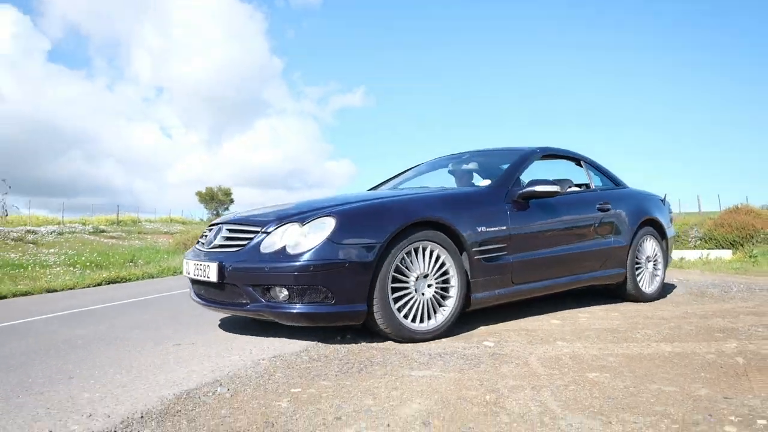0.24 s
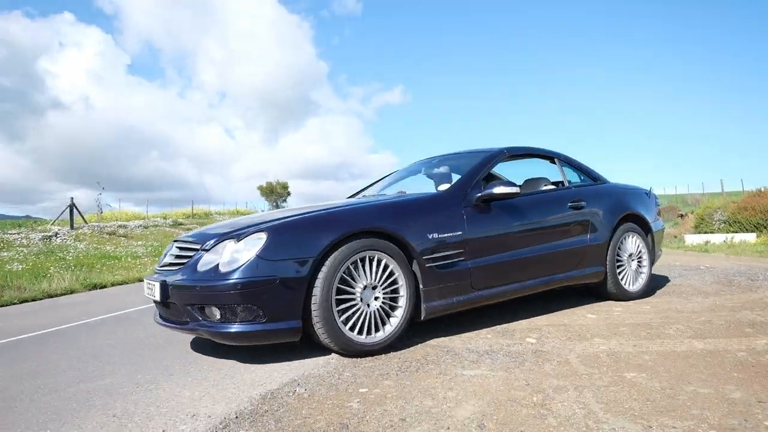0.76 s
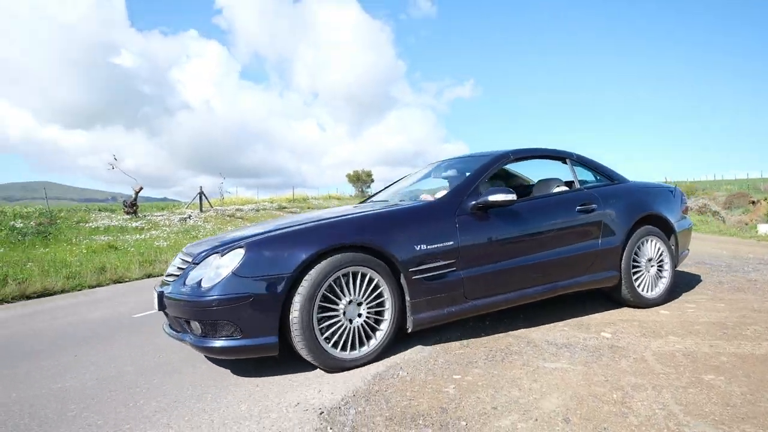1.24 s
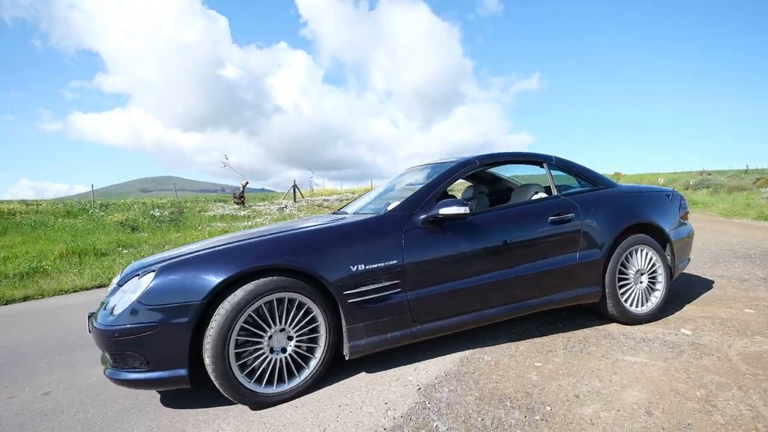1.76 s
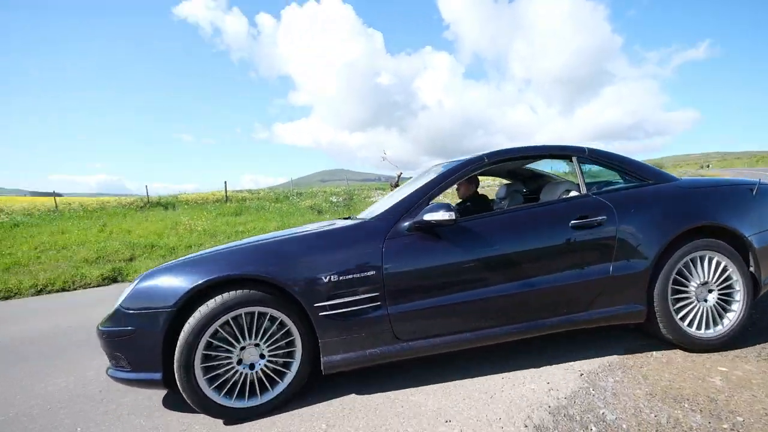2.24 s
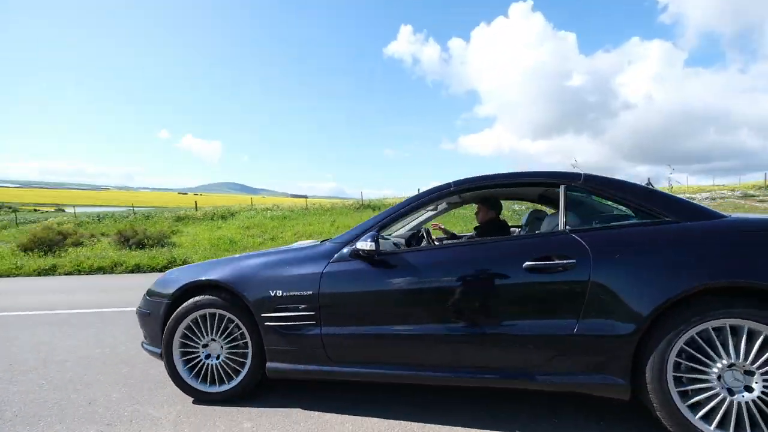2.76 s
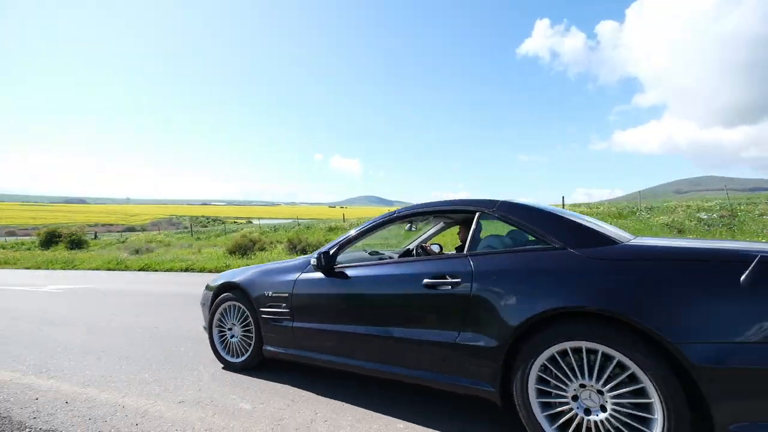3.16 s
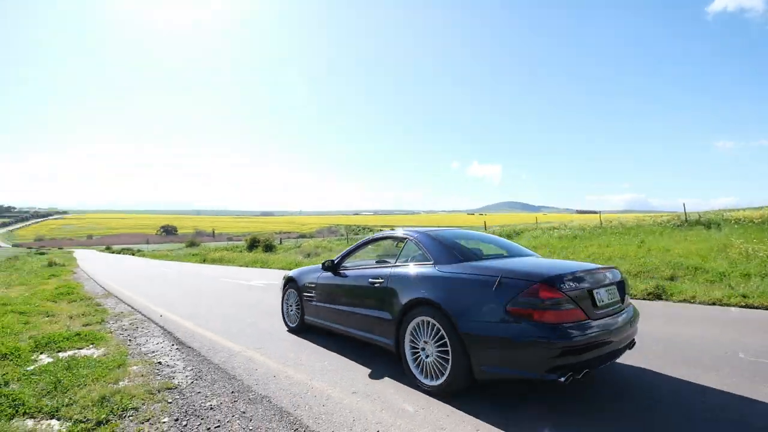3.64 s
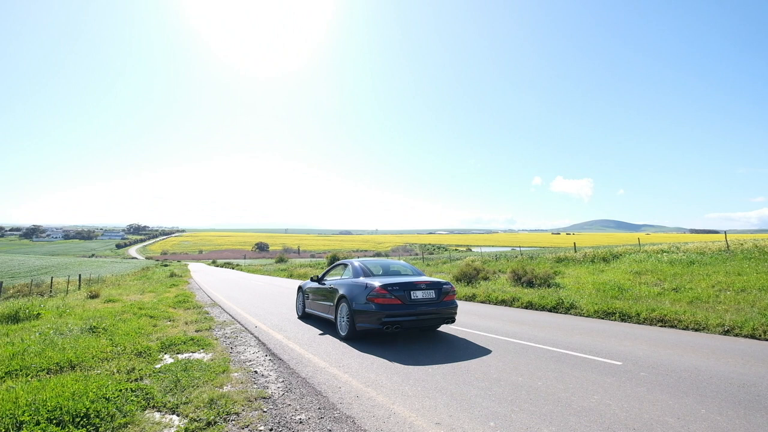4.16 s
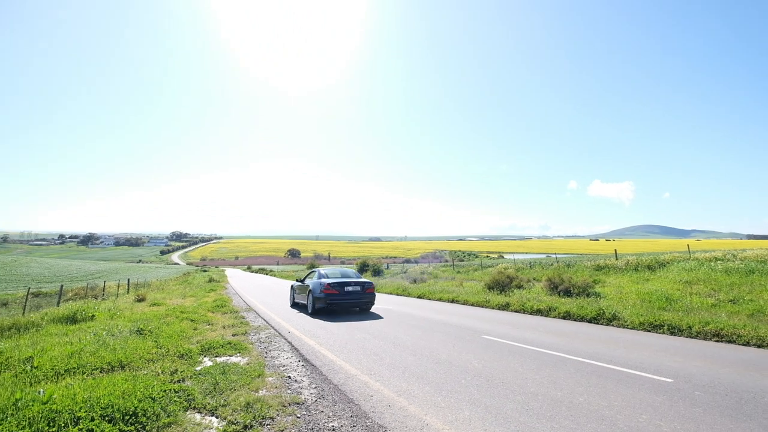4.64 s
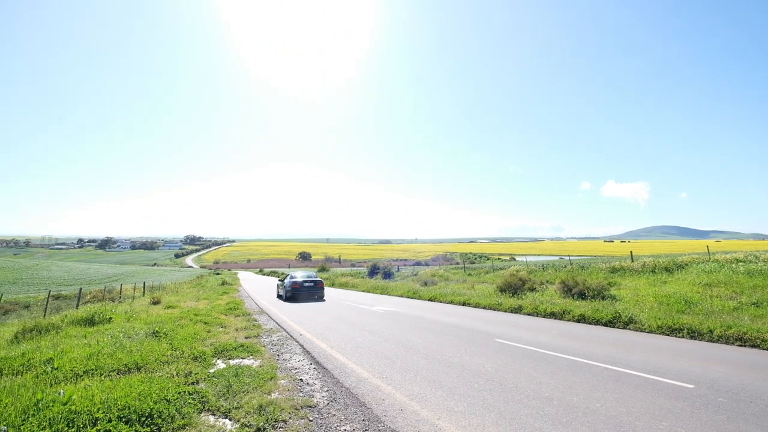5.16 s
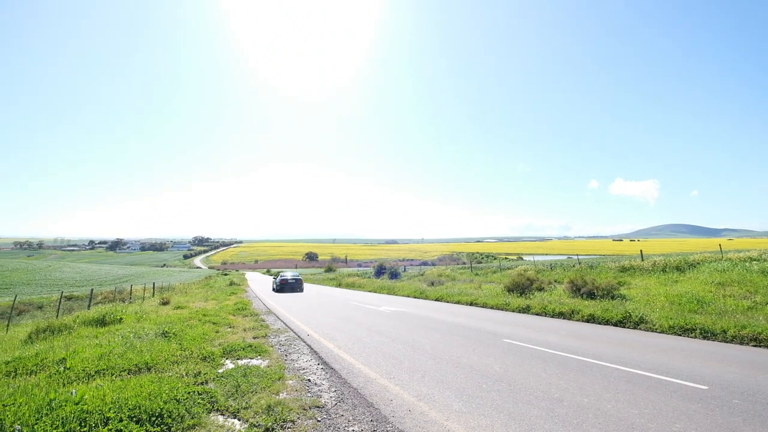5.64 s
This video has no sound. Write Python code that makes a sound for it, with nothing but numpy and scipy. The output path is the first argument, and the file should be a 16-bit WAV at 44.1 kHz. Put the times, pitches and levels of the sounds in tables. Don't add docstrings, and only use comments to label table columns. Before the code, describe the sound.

Outdoors, close stereo microphones. A large eight-cylinder car idles quietly while gravel snaps sharply under its slowly rolling tyres. Bay noise and soft hiss surround the low uneven burble. It sweeps past with a brief bass boom and tyre hiss, then the tail pipes turn to the listener: a quick raspy throttle stab, a short dip, and a hard pull away, rising in pitch as it grows duller with distance.

```python
import sys
import numpy as np
from scipy import signal
from scipy.fft import rfft, irfft, next_fast_len
from scipy.io import wavfile
from scipy.ndimage import uniform_filter1d

SR = 44100
rng = np.random.default_rng(int(sys.argv[2]) if len(sys.argv) > 2 else 0)


def materialize(psi):
    bounded = np.clip(np.atleast_2d(psi).T, -1, 1)
    quanta = np.round(bounded * 32767).astype(np.int16)
    wavfile.write(sys.argv[1], SR, quanta)


def boost(x):
    u = np.asarray(x, float) / 20
    return 10 ** u


N = 260008
TIME_S = np.arange(N) / SR
SHORT_CUT_S = 0.022

# thump size, crack level in dB, lag in ms (the far bank is later).
CYLINDERS = [(0.65, 1.5, 0.021), (0.17, -1.5, 0.7), (0.57, -10.5, 0), (0.57, -5.5, 0.58),
             (0.14, -9.5, 0.68), (0.75, -6.5, 0.16), (0.28, -4.5, 0.66), (1.31, -2, 0.067)]
# time in s, engine cycles per s.
SPEED = [(0.0, 5.64), (0.842, 5.43), (1.478, 5.62), (2.304, 6.05), (2.582, 8.2), (2.842, 7.91),
         (3.179, 8.98), (3.408, 14.02), (3.559, 14.46), (3.633, 16.95), (3.769, 19.11), (3.861, 17.71),
         (3.972, 17.33), (4.509, 27.65), (4.69, 29.91), (5.111, 34.66), (5.519, 26.06), (5.9, 28.61)]
# time in s, even firing tone in dB, effort (how hard pulses leave the pipes) in dB.
DRIVE = [(0, -32.5, -52.5), (.9, -34, -48.5), (2.2, -29.5, -47.5), (2.6, -26.5, -55), (3.1, -25, -52),
         (3.24, -24.5, -43), (3.35, -27, -35.5), (3.52, -24.5, -38.5), (3.68, -23, -34), (3.8, -18, -29.5),
         (3.98, -25.5, -41.5), (4.3, -23.5, -31), (4.55, -28, -32), (4.9, -29.5, -30), (5.14, -29.5, -29),
         (5.4, -27, -33.5), (5.62, -24.5, -33.5), (5.9, -29, -34.5)]
# frequency in Hz, level in dB.
PIPE = [(28, -29), (45, 3), (65, -0.5), (85, -1), (300, 0.5), (380, -7.5), (450, -10.5), (520, -41)]


def unit(x):
    return x / np.sqrt(np.mean(x ** 2) + 1e-20)


def along(points, hz):
    f, v = np.transpose(points)
    return np.interp(np.log(hz + 1), np.log(f + 1), v)


def curves(rows):
    s, *cols = np.transpose(rows)
    return [np.interp(TIME_S, s, c) for c in cols]


def wobble(rate_hz):
    knots = rng.standard_normal(int(N * rate_hz / SR) + 2)
    return np.interp(TIME_S * rate_hz, np.arange(len(knots)), knots)


def filtered(x, response):
    m = 2 * next_fast_len(N // 2 + SR // 4)
    return irfft(rfft(x, m) * response(np.fft.rfftfreq(m, 1 / SR)), m)[..., :N]


def resonance(f, centre_hz, width_hz):
    return 1j * f * width_hz / (centre_hz ** 2 - f ** 2 + 1j * f * width_hz)


def power_sum_db(front, rear):
    return 10 * np.log10(front ** 2 + rear ** 2 + 1e-12)


def rush(spectrum, patchy_db):
    # frequency in Hz, left-right likeness 0-1.
    alike = [(60, 0.99), (130, 1.0), (290, 1.0), (640, 1), (1410, 0.97), (3100, 0.54), (6820, 0.018),
             (15000, 0.034)]
    z = signal.stft(rng.standard_normal((2, N + 512)), nperseg=512)[2]
    field = uniform_filter1d(rng.standard_normal(z.shape[1:]), size=6, axis=0)
    field = uniform_filter1d(field, size=10, axis=1)
    pair = signal.istft(z * boost(patchy_db * unit(field)), nperseg=512)[1][:, :N]

    def mid_side(hz):
        turn = np.arccos(np.clip(along(alike, hz), -1, 1)) / 2
        return boost(along(spectrum, hz)) * [np.cos(turn), np.sin(turn)]

    mid, side = filtered(pair, mid_side)
    return unit(np.array([mid + side, mid - side]))


def crank(cycle_hz, lead_s):
    first_firing_s = 5.494
    turns = np.cumsum(cycle_hz) / SR + lead_s * cycle_hz
    return turns - turns[round(first_firing_s * SR)]


def passing():
    pass_s, width_s = 3.493, 0.21
    return np.exp(-((TIME_S - pass_s) / width_s) ** 2)


def bursts():
    # centre in s, width in s, rasp in dB, snap in dB, hiss in dB.
    openings = [
        (3.82, .07, 4.5, -8.5, -11.5),
        (4.35, 0.1, 2, 9, -0.5),
    ]
    total_db = 0
    for s, width_s, *extra_db in openings:
        total_db = total_db + np.exp(-((TIME_S - s) / width_s) ** 2) * np.array(extra_db)[:, None]
    return total_db


def strong_orders(cycle_hz, tone_db, effort_db, hidden_db):
    # order, level over effort in dB.
    uneven = [(3, 3), (5, -1), (11, 2.5), (13, 1.5)]
    # frequency in Hz, level in dB.
    overtone = [(90, -15.5), (118, -12), (137, -44), (185, -21), (230, -12), (300, -5.5), (445, -10.5),
                (490, -24)]
    bank_gap_hz, bank_share = 113.7, 0.5
    boom_db = 21.5
    levels_db = {}
    for k, over_db in uneven:
        hz = k * cycle_hz
        comb = 1 + bank_share ** 2 - 2 * bank_share * np.cos(2 * np.pi * hz / bank_gap_hz)
        levels_db[round(k)] = effort_db + over_db + along(PIPE, hz) + 10 * np.log10(comb) - hidden_db
    levels_db[5] = levels_db[5] + boom_db * passing()
    levels_db[8] = tone_db
    levels_db[16] = tone_db + along(overtone, 16 * cycle_hz)
    return levels_db


def weak_order(k, cycle_hz, effort_db, hidden_db):
    lowest_db, fourth_boom_db = -5, 7
    db = effort_db + along(PIPE, k * cycle_hz) - k % 2 * hidden_db
    return db + lowest_db * (k == 2) + fourth_boom_db * passing() * (k == 4)


def thump(cycle_hz, facing, unsteady_db):
    tone_db, effort_db = curves(DRIVE)
    pattern = np.fft.fft(np.transpose(CYLINDERS)[0])
    hidden_db = 10 * (1 - facing)
    levels_db = strong_orders(cycle_hz, tone_db, effort_db, hidden_db)
    for k in range(2, 19):
        if k not in levels_db:
            levels_db[k] = weak_order(k, cycle_hz, effort_db, hidden_db)
    steady, early = crank(cycle_hz, 0), crank(cycle_hz, SHORT_CUT_S)
    out = np.zeros(N)
    for k, db in levels_db.items():
        phase = np.angle(pattern[k % len(pattern)]) + 1.3 + 0.12 * wobble(9)
        angle = 2 * np.pi * k * (early if k % 8 else steady) + phase
        out += np.sqrt(2) * boost(db + unsteady_db * wobble(9)) * np.cos(angle)
    return out


def engine_bay(facing):
    # frequency in Hz, density in dB per Hz.
    front_view = [(210, -44), (350, -41), (484, -6), (584, -4), (750, 0.5), (880, -6.5), (973, -19),
                  (1030, -9), (1250, -1), (1620, -19), (2750, -120)]
    # frequency in Hz, density in dB per Hz.
    side_view = [(210, -30), (350, -4.5), (415, -15), (462, -31), (516, -23), (587, -10.5), (619, 0),
                 (1250, -7), (1620, -65), (2750, -120)]
    # time in s, share of the side view 0-1.
    turning = [
        (0, 0),
        (1.7, 0),
        (2.5, 1),
        (5.9, 0.9),
    ]
    side = np.clip(curves(turning)[0], 0, 1)
    bay = np.sqrt(1 - side) * rush(front_view, patchy_db=1.5) + np.sqrt(side) * rush(side_view, patchy_db=1.0)
    return np.sqrt(1 - facing) * boost(-43.5 + 2.17 * wobble(24.68)) * bay


def rasp(facing, beam, effort_db, burst_db, puffs):
    # frequency in Hz, density in dB per Hz.
    rasp_colour = [(900, -13), (1250, -9.5), (1450, -2), (1750, 1.5), (2050, -4.5), (2400, -9.5),
                   (2800, -9.5), (3500, -31.5), (5000, -36.5)]
    bay_db, pipe_db = -47, -4.5
    db = power_sum_db(boost(bay_db), beam * boost(effort_db + pipe_db))
    puffing = 1 - 0.52 * facing + 0.57 * facing * puffs
    return boost(db + burst_db + 1.06 * wobble(30)) * puffing * rush(rasp_colour, patchy_db=1.37)


def rumble(facing, effort_db, gone_s):
    # frequency in Hz, density in dB per Hz.
    rumble_colour = [(60, -28), (110, -1.5), (210, 3.5), (310, -5), (430, -3), (520, -22.5), (700, -42)]
    bay_db, pipe_db, loss_db_per_s = -41.5, 12.5, 17
    pipe = facing * boost(effort_db + pipe_db - loss_db_per_s * gone_s)
    db = power_sum_db(boost(bay_db) * (1 - facing), pipe)
    return boost(db + 1.15 * wobble(17)) * rush(rumble_colour, patchy_db=-0.5)


def off_road(x):
    # time in s, echo lag in ms.
    ground = [(0, 1.1), (2.2, 0.94), (3.2, 1.1), (4.2, 0.807), (5.9, 0.49)]
    echo_share = 0.23
    late = np.arange(N) - curves(ground)[0] * SR / 1000
    echo = np.array([np.interp(late, np.arange(N), side) for side in x])
    return (x + echo_share * echo) / np.sqrt(1 + echo_share ** 2)


def hiss(facing, beam, effort_db, gone_s, snap_db, burst_db, spits, snaps):
    # frequency in Hz, density in dB per Hz.
    hiss_colour = [(1880, -1.5), (3200, 0), (4440, -6), (4910, -5), (6500, -11), (12400, -20), (15800, -50)]
    bay_db, tyre_db, sizzle_db = -50.5, -47, 5
    pipe_db, loss_db_per_s = -8.5, 2
    tyres = boost(bay_db) * np.sqrt(1 - facing) + boost(tyre_db) * passing()
    pipe = beam * boost(effort_db + pipe_db - loss_db_per_s * gone_s)
    db = power_sum_db(tyres, pipe)
    spitting = 1 - 0.05 * facing + 0.4 * facing * spits
    out = boost(db + burst_db + 0.25 * wobble(30)) * spitting * off_road(rush(hiss_colour, patchy_db=2.1))
    far = np.interp(TIME_S, [4.4, 5.1], [0, 1])
    out = (1 - far) * out + far * filtered(out, lambda hz: 1 / (1 + 1j * hz / 6000) ** 2)
    sizzle = filtered(out, lambda hz: (hz / 11000) ** 3 / (1 + (hz / 11000) ** 3))
    out = out + boost(sizzle_db) * passing() * sizzle
    return out + boost(db - 2.0 + snap_db) * facing * (1 - far) * snaps


def stone(db, hz, knock_db, pan_db):
    dulling = 0.46
    t = np.arange(SR // 50) / SR
    snap = np.sin(2 * np.pi * hz * t) * boost(-60 * t * hz / 14)
    hollow = signal.butter(2, [900, 2000], "band", fs=SR)
    knock = boost(knock_db - 60 * t / 0.025) * unit(signal.lfilter(*hollow, rng.standard_normal(len(t))))
    decay = 0.5 * boost(-60 * t / 0.003) + 0.11 * boost(-60 * t / 0.034)
    band_hz = np.clip([hz / 1.3, hz * 3.2 * boost(-dulling * knock_db)], [500, 3200], [10000, 11500])
    bright = signal.butter(2, band_hz, "band", fs=SR)
    chips = signal.lfilter(*bright, rng.standard_normal((2, len(t))) * decay)
    hit = 0.32 * snap + knock + 1.5 * chips * (1 - np.exp(-t / 0.00034))
    return boost(db) * hit * boost([[pan_db / 2], [-pan_db / 2]])


def stones():
    # start in s, peak in dB, dull knock in dB, left over right in dB.
    snapped = [(0.055, -40.5, -1, -4), (0.119, -30, -3, 3), (0.195, -32.5, 1, -1), (0.3387, -25, -1, -3),
               (0.351, -24.5, 2, 4), (0.3575, -50.5, 18, 0), (0.3706, -39, 14, -8), (0.517, -29, -7, -4),
               (0.5498, -33.5, -3, -3), (0.6476, -20.5, -16, -1), (0.6996, -25, -13, -2),
               (0.7096, -17.5, -16, -3), (0.717, -31, -5, -9), (0.758, -41.5, 10, -8),
               (0.8034, -36.5, 5.5, -4), (1.0876, -42.5, 11.5, 2), (1.3498, -53, -5, -5),
               (1.44, -35.5, 5.5, -2), (1.748, -41, 5, -10), (2.0212, -36.5, 5.5, -13.5),
               (2.403, -31, -1.5, -5), (2.503, -38, 11.5, -5), (2.649, -36, -3, -1),
               (2.773, -28.5, -7.5, -14.5), (2.785, -35.5, 2, -4), (2.8007, -37, 3, -6),
               (2.959, -30, -21, -3), (3.5, -41, -16, -2), (3.7686, -17.5, -4, 5), (3.824, -20.5, -5, 4)]
    hits = [(s, db, 2620, knock_db, pan_db) for s, db, knock_db, pan_db in snapped]
    for _ in range(80):
        s, loudness, pitch = rng.uniform(0, 3.9), rng.exponential(), rng.normal()
        hits.append((s, -52 + 3.5 * loudness, 4000 * boost(4 * pitch), -6, 2 * pitch))
    out = np.zeros((2, N + SR))
    for s, *settings in hits:
        sound = stone(*settings)
        start = round(s * SR)
        out[:, start:start + sound.shape[1]] += sound
    return out[:, :N]


def firings(turns):
    count = len(CYLINDERS)
    slots = np.floor(count * turns).astype(int)
    at = np.flatnonzero(np.diff(slots))
    cylinder = slots[at + 1] % count
    late = np.transpose(CYLINDERS)[2][cylinder] * SR / 1000 + 2 * rng.standard_normal(len(at))
    return np.clip(at + np.round(late).astype(int), 0, N - 1), cylinder


def crack(cycle_hz, scatter_db):
    # centre in Hz, width in Hz, level in dB.
    tips = [(690.4, 150, 0.5), (878, 410, -8)]
    at, cylinder = firings(crank(cycle_hz, SHORT_CUT_S))
    size_db = np.transpose(CYLINDERS)[1][cylinder] + scatter_db * rng.standard_normal(len(at))
    train = np.bincount(at, boost(size_db) / np.sqrt(cycle_hz[at]), N)
    hard = train ** 2

    def pipe_ends(f):
        modes = sum(boost(db) * resonance(f, c, w) for c, w, db in tips)
        low_cut = (1 + 300 / (1j * f + 1)) ** 2
        return modes ** 2 / low_cut / (1 + 1j * f / 1400) / (1 + 1j * f / 3500) ** 2

    def puffing(t60_s):
        t = np.arange(SR // 20) / SR
        puff = boost(-60 * t / t60_s) * (1 - np.exp(-t / 0.00089)) ** 2
        return unit(signal.fftconvolve(hard, puff)[:N])

    ring = filtered(train, pipe_ends)
    spikes = filtered(hard, lambda f: resonance(f, 720, 560) ** 2 / (1 + 1j * f / 4000))
    snaps = filtered(hard, lambda f: resonance(f, 2800, 4000) / (1 + 1j * f / 6000) ** 3)
    return unit(ring), unit(spikes), unit(snaps), puffing(0.028), puffing(0.014)


def bark(beam, effort_db, snap_db, ring, spikes, puffs):
    # frequency in Hz, density in dB per Hz.
    flow_colour = [(480, -35), (600, -31), (700, -3), (950, -2.5), (1200, -21.5), (1500, -90)]
    bark_db, spike_db = 8.5, -18
    flow = boost(-10) * (0.4 + 0.8 * puffs) * rush(flow_colour, patchy_db=1.5)
    return beam * boost(effort_db + bark_db) * (boost(-3.0) * ring + flow + boost(spike_db + snap_db) * spikes)


def scene():
    # time in s, share of the sound straight from the tail pipes 0-1.
    tail_view = [
        (0, 0),
        (3.2, 0),
        (3.45, .4),
        (3.71, .72),
        (3.78, .96),
        (3.88, .9),
        (4.0, .6),
        (4.25, 1),
        (5.9, 1),
    ]
    cycle_hz, effort_db, facing = curves(SPEED)[0], curves(DRIVE)[1], curves(tail_view)[0]
    beam = np.clip(facing, 0, 1) ** 2.3
    gone_s = np.clip(TIME_S - 3.9, 0, None)
    rasp_burst_db, snap_burst_db, hiss_burst_db = bursts()
    ring, spikes, snaps, puffs, spits = crack(cycle_hz, scatter_db=1.2)
    mix = thump(cycle_hz, facing, unsteady_db=1.77) + engine_bay(facing)
    mix = mix + rasp(facing, beam, effort_db, rasp_burst_db, puffs)
    mix = mix + rumble(facing, effort_db, gone_s)
    mix = mix + hiss(facing, beam, effort_db, gone_s, snap_burst_db, hiss_burst_db, spits, snaps)
    mix = mix + stones()
    return mix + bark(beam, effort_db, snap_burst_db, ring, spikes, puffs)


def ducked(x):
    duck_s, duck_db, recover_s = 0.385, 4, 0.09
    since_s = TIME_S - duck_s
    return x * boost(-duck_db * (since_s > 0) * np.exp(-np.abs(since_s) / recover_s))


def band_limit(x):
    return signal.sosfilt(signal.butter(12, 16520, fs=SR, output="sos"), x)


def record(dry):
    top_hz = 15830
    mix = filtered(ducked(dry), lambda hz: hz < top_hz)
    return band_limit(mix)


dry = scene()
out = record(dry)
materialize(out)
```